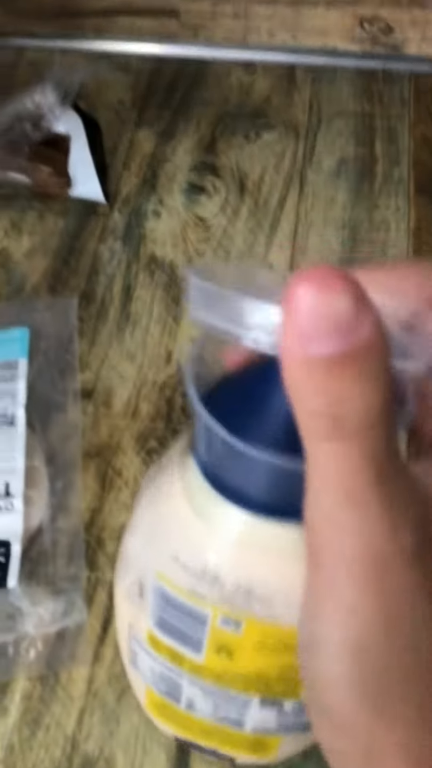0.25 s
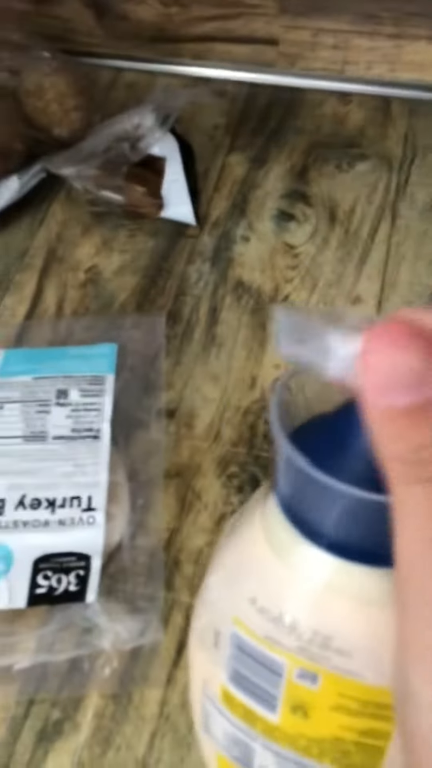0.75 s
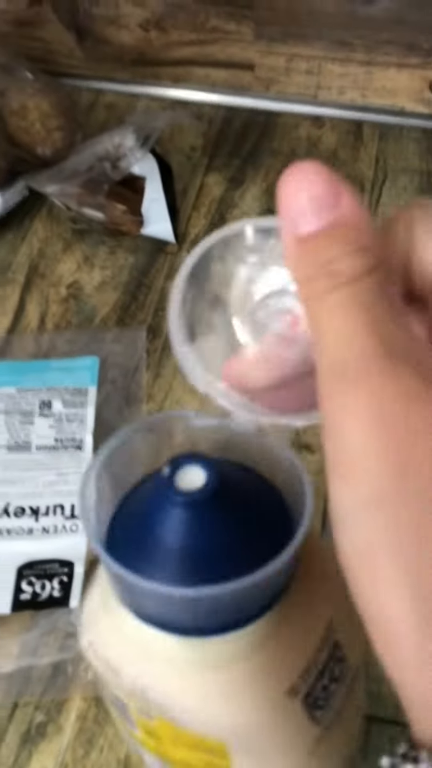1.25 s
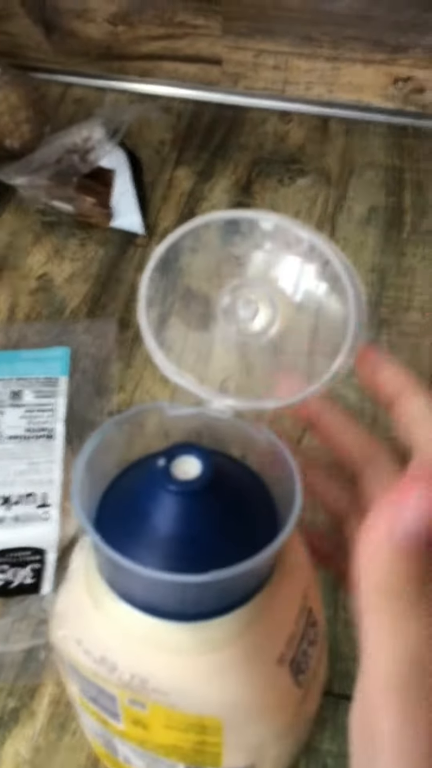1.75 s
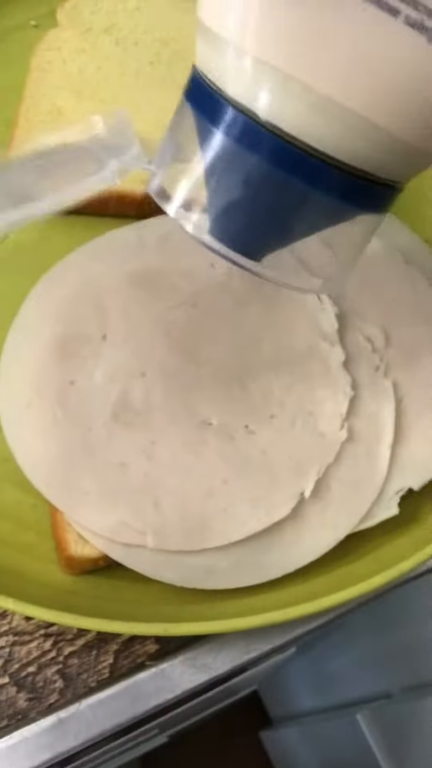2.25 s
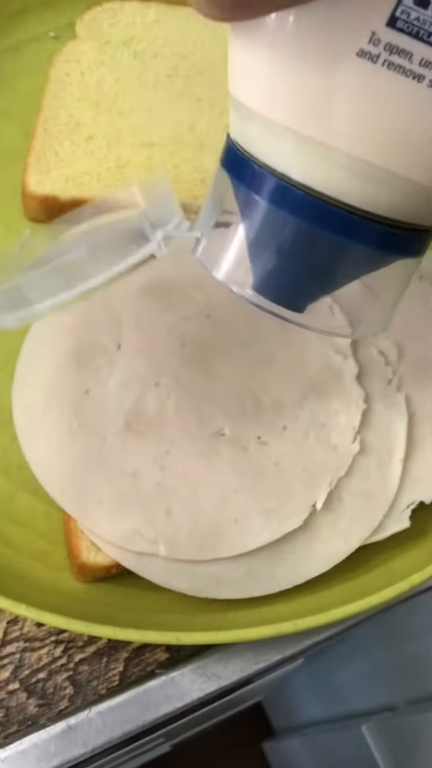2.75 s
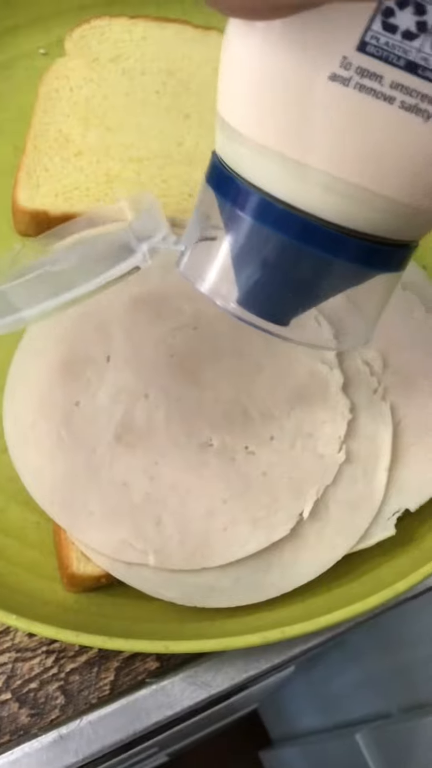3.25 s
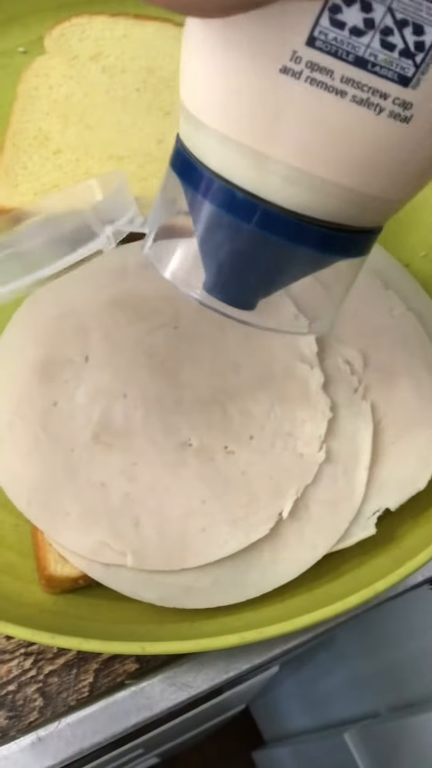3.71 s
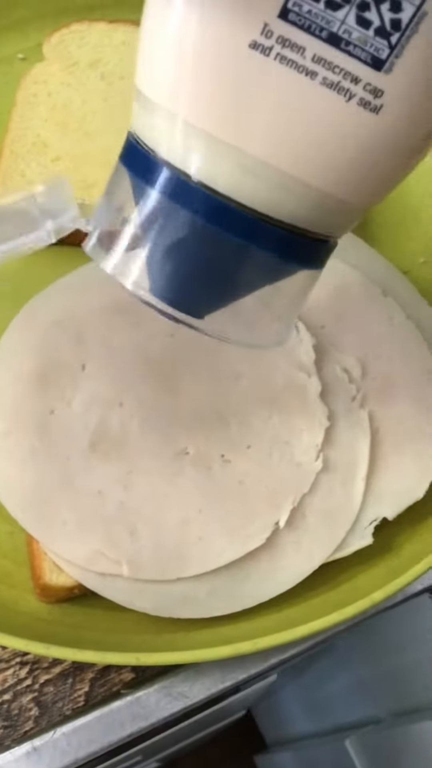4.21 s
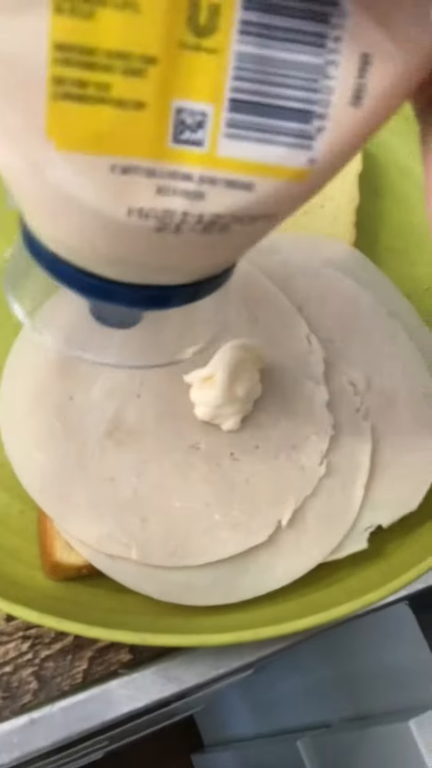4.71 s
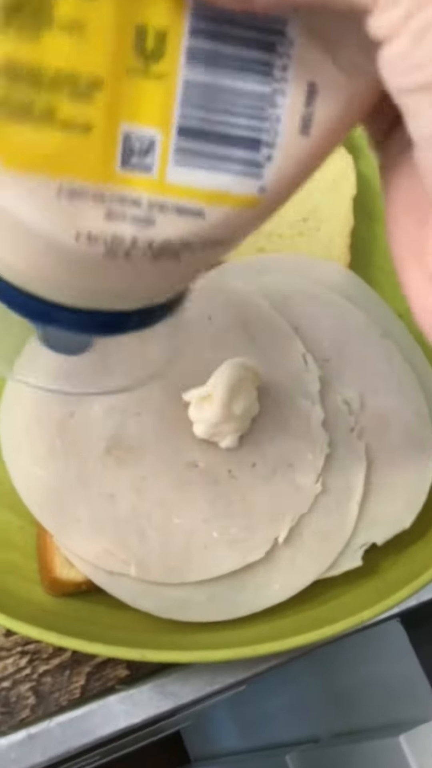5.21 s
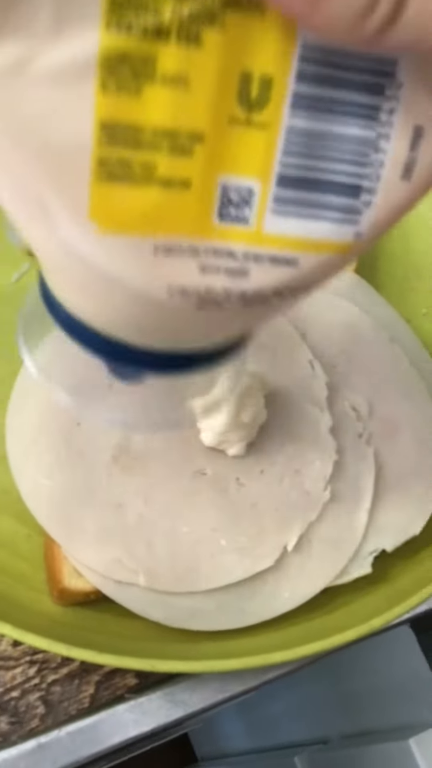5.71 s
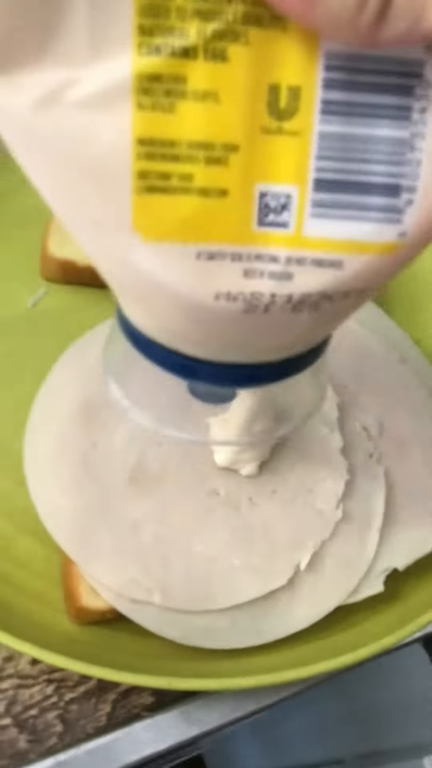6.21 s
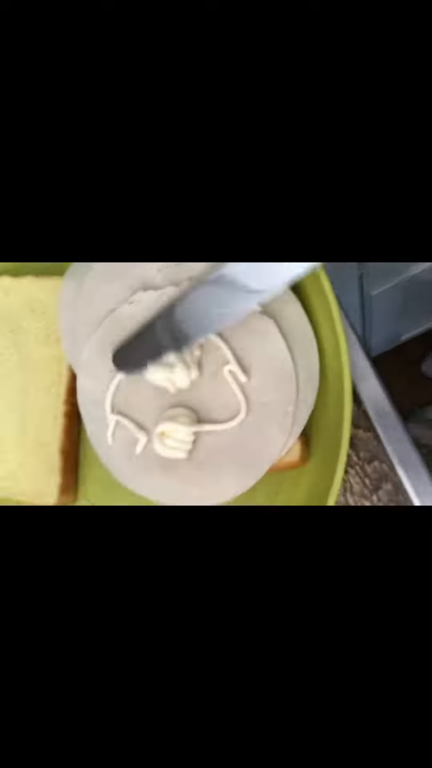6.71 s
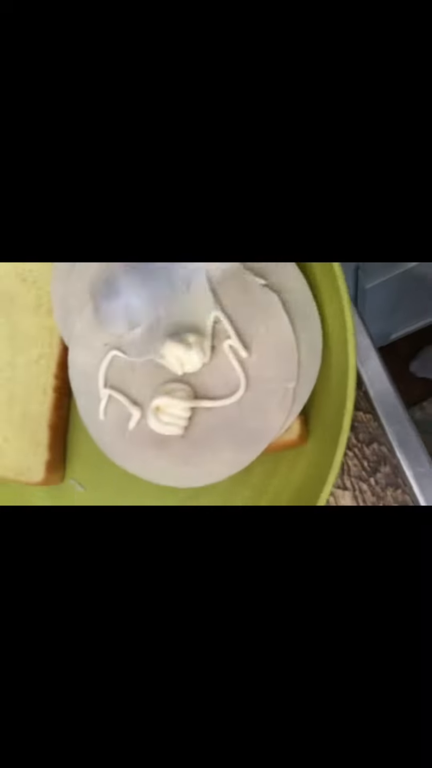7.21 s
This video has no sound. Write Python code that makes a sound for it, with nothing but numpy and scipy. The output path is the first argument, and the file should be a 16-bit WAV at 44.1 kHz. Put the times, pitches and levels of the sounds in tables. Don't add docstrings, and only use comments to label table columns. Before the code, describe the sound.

In a quiet kitchen with a humming fridge, a thumb rubs a plastic lid, which snaps open as the bottle knocks the table. Squeezed walls then crack loudly and pop hollowly, with a short hiss of air. Sauce sputters and squeaks out amid more crackles, and a knife smears it very quietly. Close small microphone, slight echo, abrupt cuts between four takes.

```python
import sys
import numpy as np
from scipy import signal
from scipy.fft import rfft, irfft
from scipy.io import wavfile
from scipy.ndimage import uniform_filter1d

SR = 44100
rng = np.random.default_rng(int(sys.argv[2]) if len(sys.argv) > 2 else 0)


def dump(signal):
    limited = np.clip(np.atleast_2d(signal).T, -1, 1)
    pcm = np.round(limited * 32767).astype(np.int16)
    wavfile.write(sys.argv[1], SR, pcm)


def boost_factor(decibels):
    exponent = np.asarray(decibels, float) / 20
    return 10 ** exponent


N = 328986

# (start [s], end [s])
JOINS = [
    (0, 1.8578),
    (1.8628, 4.4245),
    (4.4325, 6.6908),
    (6.6998, 7.5),
]
# (pitch [Hz], width [Hz], level [dB])
WALL = [(2300, 1400, 3.5), (3760, 430, 0.5), (5200, 890, 3), (6440, 540, 3.5), (8760, 1000, 4),
        (11595, 940, 0.5)]


def evened(x):
    return x / np.sqrt(np.mean(x ** 2) + 1e-20)


def read(points, hz):
    f, value = np.transpose(points)
    return np.interp(np.log(hz + 1), np.log(f + 1), value)


def add(mix, s, sound):
    part = mix[round(s * SR):][:len(sound)]
    part += sound[:len(part)]


def lumps(n, smooth):
    return evened(uniform_filter1d(rng.standard_normal(n), smooth))


def resonate(x, hz, width_hz):
    r = np.exp(-np.pi * abs(width_hz) / SR)
    c = np.cos(2 * np.pi * hz / SR)
    return 2 * (1 - r) * signal.lfilter([1, -r * c], [1, -2 * r * c, r ** 2], x)


def resonate_twice(x, hz, width_hz):
    return resonate(resonate(x, hz, width_hz), hz, width_hz)


def coloured(x, db):
    log_gain = np.log(boost_factor(np.concatenate([db, db[-2:0:-1]])))
    response = np.exp(log_gain - 1j * signal.hilbert(log_gain).imag)
    return irfft(rfft(x) * response[:len(db)], len(x))


def played(rows, sound, column=1):
    s, db = np.transpose(rows)[[0, column]]
    return sound * boost_factor(np.interp(np.arange(N) / SR, s, db, -200, -200))


def stroked(rows, sound):
    t = np.arange(N) / SR
    stroke_db = 22.5
    level = 0
    for s, db, swell, fade in rows:
        level = level + boost_factor(db - stroke_db * np.maximum((s - t) / swell, (t - s) / fade))
    return sound * level


def hiss(peaks, base_db, lumpy_db):
    n = rng.standard_normal(N) * boost_factor(lumpy_db * lumps(N, 200))
    n = signal.sosfilt(signal.butter(2, 1200, "high", fs=SR, output="sos"), n)
    ringing = sum(boost_factor(db) * resonate_twice(n, hz, width) for hz, width, db in peaks)
    return evened(boost_factor(base_db) * n + ringing)


def modes(table, rise, upper_db=0.):
    t = np.arange(SR // 3) / SR
    ring = 0
    for k, (hz, db, t60) in enumerate(table):
        ring = ring + boost_factor(db + upper_db * (k > 0) - 60 * t / t60) * np.sin(2 * np.pi * hz * t)
    ring = ring * (1 - np.exp(-t / max(rise, 1e-4)))
    return ring / abs(ring).max()


def room_noise():
    # (frequency [Hz], level [dB per Hz])
    hush_colour = [(40, -53), (62, -48), (85, -41.5), (110, -24.5), (160, -30.5), (210, -13), (300, -13),
                   (400, -21), (470, -26.5), (900, -30.5), (1300, -39), (2000, -41.5), (6000, -47.5),
                   (8000, -51), (16000, -54)]
    frames, hz = N // 256 + 5, np.fft.rfftfreq(1024, 1 / SR)
    a, b, patches = rng.standard_normal((frames, 513, 3)).T
    patches = evened(uniform_filter1d(uniform_filter1d(patches, 10, 0), 12, 1))
    spectrum = (a + 1j * b) * boost_factor(read(hush_colour, hz)[:, None] + 2.5 * patches)
    return evened(signal.istft(spectrum, nperseg=1024, noverlap=768)[1][:N])


def fridge():
    # (pitch [Hz], level [dB])
    hum = [(327.8, 0), (336.4, -14), (356.6, -15), (382.3, -15)]
    throb_hz = [109.3, 120.0]
    wobble, t = rng.standard_normal(N), np.arange(N) / SR
    tones = 0
    for hz, db in hum:
        steady = np.sqrt(2) * np.sin(2 * np.pi * hz * t)
        tones = tones + boost_factor(db) * (steady + 0.13 * evened(resonate(wobble, hz, 2.1)))
    whine = boost_factor(-29.5) * evened(resonate_twice(wobble, 6150, 600))
    throb = sum(np.sin(2 * np.pi * hz * t) for hz in throb_hz)
    return tones + whine, throb + 0.088 * evened(resonate(wobble, 100, 15))


def background():
    # (room noise [dB], fridge tone [dB], fridge throb [dB])
    levels = [
        (-57.5, -62.5, -65.5),
        (-60, -54.5, -67),
        (-58.5, -53.5, -66.5),
        (-58, -54.5, -65.5),
    ]
    tones, throb = fridge()
    return boost_factor(np.array(levels)) @ np.array([room_noise(), tones, throb])


def thumb_rubs():
    # (peak time [s], peak [dB], swell [s], fade [s])
    strokes = [(0.002, -67, .02, 0.16), (.238, -62, 0.18, 0.052), (.312, -71.5, 0.021, 0.19),
               (.482, -64.5, 0.03, 0.19), (.676, -55.5, 0.029, 0.045), (.545, -63.5, .04, 0.046),
               (.72, -73, 0.071, 0.17), (.838, -51.5, 0.058, 0.079), (.968, -58, 0.069, 0.1),
               (1.12, -47, 0.054, 0.067), (1.165, -31, 0.065, 0.02)]
    # (pitch [Hz], width [Hz], level [dB])
    lid = [(1820, 740, 3), (2600, 690, 4), (3780, 590, 3.5), (4350, 540, 3.5), (5200, 900, -2),
           (6300, 1740, 2), (8800, 1800, -6.5), (11100, 810, -5), (14000, 3400, -14)]
    return stroked(strokes, hiss(lid, -2.8, 1.9))


def snap(ring_hz, after_db, low_db, high_db, wall_db):
    t, hz = np.arange(8192) / SR, np.fft.rfftfreq(8192, 1 / SR)
    noise = rng.standard_normal(8192)
    tick = 3.09 * np.exp(-t / .00005) * np.sign(noise[0])
    crack = boost_factor(-60 * t / .007)
    grain_db = after_db + 2.1 * lumps(8192, 30)
    rattle = boost_factor(grain_db) * (boost_factor(-60 * t / 0.041) + boost_factor(-8.5 - 60 * t / 0.1))
    burst = noise * (crack + rattle) * (t < .13) + tick
    tilt_db = read([(150, low_db - 32.5), (500, low_db + 2.0), (1300, low_db + 9.0), (4000, 0.00023),
                    (10000, high_db + 4.5), (16000, high_db + 4.5)], hz)
    tilt_db = tilt_db - 2.5 * np.log2(ring_hz / 4500) * (hz < 1800) * (low_db < -10)
    ring_db = min(10, ring_hz / 350) / (1 + ((hz - ring_hz) / (300 + .06 * ring_hz)) ** 2)
    sound = coloured(burst, tilt_db + ring_db + wall_db)
    upper = irfft(rfft(sound) * (hz > 1800))
    return sound / abs(upper).max()


def snaps():
    bright = [(1.8673, -18.5, 13200, 6), (2.0412, -18, 8400, -11), (2.0851, -20.5, 11100, 0),
              (2.1152, -14, 5680, 5), (3.7085, -28, 12000, -5), (2.952, -24, 6850, -3),
              (2.6704, -31, 7490, -2), (2.851, -5.5, 13030, -14), (3.7304, -12, 5400, 0),
              (3.7571, -5.5, 10500, -2), (4.1867, -49, 8830, -5), (5.2287, -49, 12080, -5),
              (5.2523, -42, 12660, -1), (5.2652, -13.5, 5320, -18), (5.7308, -33, 14500, -15.5),
              (6.5465, -52, 14500, -10), (6.4368, -56, 7500, -9.5), (6.5385, -51, 7970, -7.5),
              (6.615, -57, 11460, -5), (4.417, -50, 12970, -7.5), (6.4879, -50, 12400, -6.5),
              (6.5317, -43.5, 14800, 0)]
    crisp = [(2.1824, -5.5, 7850, -11), (2.265, -40, 8480, -15), (2.6318, -9.5, 7600, -8.5),
             (2.8781, -5.5, 2600, -7), (4.1595, -37, 2150, 9), (4.4002, -25.5, 7880, -14),
             (5.428, -35, 8640, -14.5), (5.5, -3.5, 10300, -13), (5.5829, -11, 4360, -20),
             (1.174, -11.5, 4370, -25)]
    pinched = [(.673, -37, 6300, 1), (1.2008, -20, 2600, -23), (2.1216, -5, 9170, -9.5),
               (2.2538, -27.5, 7170, -11), (2.4725, -35.5, 5430, 3), (2.836, -17, 4300, -1.5),
               (2.8777, -0.5, 3200, -8.5), (2.889, -12.5, 1850, 6), (3.1016, -10.5, 4780, -12),
               (3.1019, -15.5, 3200, -12), (3.2174, -18, 4130, -11), (3.2172, -11, 7330, -9.5),
               (3.8633, -31.5, 10200, -16.5), (3.9082, -36, 4740, -12), (4.067, -41.5, 9440, -2.5),
               (4.2531, -30.5, 6380, -6.5), (4.2567, -17, 11300, -18), (4.5165, -15.5, 3760, -19),
               (5.3234, -19, 5000, -15.5), (5.4357, -19, 8500, -6), (5.5737, -19.5, 7560, -10),
               (5.9267, -25.5, 6460, -7.5), (5.5845, -20.5, 11800, -2), (6.505, -46, 8730, -2),
               (2.6313, -8, 8400, -8.5), (6.677, -21, 5150, -13)]
    full = [(2.1018, -17, 7220, 13), (2.118, -19.5, 8100, 3.5), (2.1602, -20.5, 8230, 2.5),
            (2.5748, -37, 2400, -2.5), (2.8022, -8.5, 5200, -5.5), (2.8052, -1, 4380, 2),
            (2.8076, -7.5, 1600, 2.5), (2.8395, -16, 4740, -0.5), (2.7855, -44.5, 9000, -12),
            (2.1234, -6.5, 5500, -8.5), (3.4407, -41, 3530, -11), (3.641, -20, 3000, 7),
            (3.8247, -33.5, 2490, -5), (4.1203, -47, 2300, 1), (4.1296, -47, 11730, 9),
            (4.1382, -32.5, 2360, -2.5), (4.2197, -34.5, 2750, -9), (4.5116, -26.5, 2190, -3),
            (4.5132, -15.5, 1890, 4.5), (5.245, -38, 2340, 3), (5.414, -21, 7640, -25),
            (5.6596, -42, 5000, 10), (5.483, -30, 5380, -8), (5.4952, -30, 5400, 13), (5.507, -24, 8660, 3),
            (5.5227, -13.5, 8540, 6), (5.7443, -21.5, 4870, -3.5), (5.8607, -40.5, 2330, -22.5),
            (6.561, -41, 1880, -7.5)]
    crinkle = [(3.1, -15.5, 9440, -5.5), (3.6862, -15, 12580, -14.5), (4.0732, -40, 12400, -3),
               (4.1039, -46, 10300, -2.5), (4.3023, -20.5, 11800, -10), (4.502, -30, 10850, -8.5),
               (5.21, -50, 11760, -3.5), (6.4282, -52, 1803, -11.5), (6.463, -55, 8350, -12),
               (6.5147, -54, 12600, 11), (6.5183, -36.5, 2020, -14), (6.595, -55, 2430, -7)]
    dents = [(1.1762, -23, 1900, -4), (2.4825, -19, 1900, -16), (2.8801, -24, 2110, 10),
             (3.4191, -41.5, 2240, -18), (3.6974, -14.5, 2300, -9.5), (5.631, -59, 1200, 0),
             (2.4832, -22, 1090, -7)]
    clacks = [(.309, -56.5, 2020, -4), (.4805, -47, 2740, 8), (.493, -48, 2010, 4),
              (.7191, -45.5, 2180, -10), (1.1728, -18.5, 2760, 5), (1.3217, -38.5, 2900, 2),
              (1.3225, -35, 1900, -3.5), (1.4117, -45, 1780, 2), (1.4238, -34.5, 1600, 17),
              (1.4537, -49, 2040, 12), (1.8001, -60, 1780, -1), (1.8113, -64, 1810, -13),
              (5.6686, -49, 2150, -19), (5.6848, -45.5, 1830, -5), (5.7134, -49, 1820, -4)]
    muffled = [(5.194, -42.5, 2700, -5), (5.3555, -41, 5100, 2), (5.6476, -35, 2100, 6),
               (5.3, -46, 2700, -6), (5.904, -59, 2500, -3), (6.5517, -34.5, 2730, -7.5),
               (3.6708, -26.5, 5530, -1), (5.9, -52.5, 2500, 5), (6.64, -59, 2000, -7),
               (4.418, -44.5, 2400, -9), (4.4463, -52.5, 1700, -1), (5.738, -46, 2500, -3),
               (3.3, -46, 2700, -3)]
    # (rows, lows [dB], highs [dB])
    kinds = [(bright, -15.5, 6), (crisp, -14.5, -0.86), (pinched, -20.5, -10.5), (full, -4, -1.1),
             (crinkle, -2, 9), (dents, 10.5, -3.5), (clacks, 9.8, -19.5), (muffled, -7.5, -23)]
    out, t, hz = np.zeros(N), np.arange(8192) / SR, np.fft.rfftfreq(8192, 1 / SR)
    wall_db = sum(db / (1 + (2 * (hz - f) / width) ** 2) for f, width, db in WALL)
    for rows, low_db, high_db in kinds:
        for s, db, ring_hz, after_db in rows:
            sound = boost_factor(db) * snap(ring_hz, after_db, low_db, high_db, wall_db)
            left = min(end - s for _, end in JOINS if end > s)
            add(out, s - .0001, sound[t < min(left, .15)])
    return out


def knocks():
    # (time [s], peak [dB], share of upper modes [dB])
    hits = [(0.478, -28, -15.5), (0.717, -28.5, -11.5), (1.173, -11.5, 1), (1.183, -14, -8),
            (1.322, -26.5, -8.5), (1.425, -26, -8), (1.443, -27.5, -11.5)]
    # (pitch [Hz], level [dB], time to die 60 dB [s])
    board = [(127.4, -3, 0.13), (143.6, -11, 0.15), (222.9, -10.5, 0.22), (270, -4, 0.099),
             (350, -8.5, 0.082), (398, -11, 0.062), (448, -17.5, 0.089), (600, -19, 0.04), (770, -16, 0.04),
             (1010, -16, .045), (1283, -11, 0.043)]
    out = np.zeros(N)
    for s, db, upper_db in hits:
        vary = rng.uniform([.985, .6, .8], [1.015, 1.4, 1.2], (len(board), 3))
        add(out, s, boost_factor(db) * modes(board * vary, 0.025, upper_db))
    return out


def creeping():
    # (peak time [s], peak [dB], swell [s], fade [s])
    creep = [(4.36, -74.5, .5, 0.3), (4.436, -71.5, .004, .09), (5.3, -70, .2, 0.42), (5.53, -71.5, .4, .5),
             (6.6, -79, .3, 0.058)]
    rustle = [(2.1232, -28, 0.016, 0.01), (2.128, -39.5, 0.031, 0.11), (2.882, -28, 0.0022, 0.095),
              (3.103, -59, 0.0023, 0.115), (3.219, -64, .002, 0.083)]
    fizz = [(3, -58.5, .06, .2), (3.645, -38, .01, .08), (3.76, -39, .002, .06), (2.89, -50.5, .02, 0.0897)]
    # (pitch [Hz], width [Hz], level [dB])
    belly = [(1800, 1200, 5.5), (2300, 310, 3), (3200, 590, 1), (4300, 1400, 2.5), (7000, 2500, -2.5),
             (9200, 1500, -3.5)]
    # (pitch [Hz], width [Hz], level [dB])
    label = [(9500, 2500, 0), (12000, 2500, 1), (14000, 2500, 4)]
    creaks = stroked(creep, hiss(WALL, 9, 6.0))
    return creaks + stroked(rustle, hiss(belly, -8, 2.5)) + stroked(fizz, hiss(label, -25.5, 2.5))


def pops():
    # (time [s], peak [dB], pitch [Hz], rise [s])
    flips = [(2.102, -17.5, 271.4, 0.0025), (2.183, -18.5, 241, 0.002), (2.483, -25.5, 270, .0021),
             (2.8061, -8, 240.6, 0.005), (2.879, -15, 283, 0.0012), (3.104, -31, 216, 0.0017),
             (3.643, -31, 290, 0.0021), (3.699, -19.5, 247, 0.0034), (4.388, -40.5, 285, 0.002),
             (5.523, -35.5, 256, 0.0018), (5.646, -44, 294, .0018), (5.667, -35.5, 282, 0.0009),
             (6.425, -46, 327, 0.0025), (6.561, -35.5, 311, 0.0015)]
    pop_cycles, grip_cycles = 11, 2.68
    out, t = np.zeros(N), np.arange(SR // 3) / SR
    for s, db, hz, rise in flips:
        t60 = pop_cycles / hz
        partials = [(hz, 0, t60), (2.2 * hz, -10, 0.66 * t60), (1.5 * hz, -8, 0.92 * t60),
                    (1.2 * hz, -8, 1.0 * t60), (3.3 * hz, -18, .6 * t60)]
        grip = .12 + 0.89 * np.exp(-(t * hz / grip_cycles) ** 4)
        add(out, s, boost_factor(db) * modes(partials, rise) * grip)
    return out


def panel_rings():
    # (time [s], peak [dB])
    hits = [
        (2.8785, -15.5),
        (2.806, -22),
    ]
    # (pitch [Hz], level [dB], time to die 60 dB [s])
    panel = [(360.2, -2, 0.081), (1450, -12, .05), (1779, 0, .075), (2180, -9, .12), (2320, -5.5, .11),
             (3036, -9, 0.11), (3606, -8, .06)]
    out = np.zeros(N)
    for s, db in hits:
        add(out, s, boost_factor(db) * modes(panel, 0.0011))
    return out


def air_jet():
    # (time [s], level [dB], whistle [dB])
    puffs = [
        (3.442, -73.5, -6.5),
        (3.47, -58, -6.5),
        (3.612, -52, 5.5),
        (3.63, -50, 3.5),
        (3.638, -40, -12),
        (3.645, -46, -13),
    ]
    # (pitch [Hz], width [Hz], level [dB])
    jet = [(3610, 800, 4), (5000, 900, -7), (7965, 700, -8), (9510, 1200, -8), (13500, 2000, -3.5),
           (15000, 1500, -6)]
    flutter = rng.standard_normal(N) * boost_factor(1.9 * lumps(N, 400))
    whistle = evened(resonate_twice(flutter, 1760, 670))
    return played(puffs, hiss(jet, -9.5, 0.73) + played(puffs, whistle, column=2))


def sputter():
    # (time [s], level [dB])
    bursts = [(4.5132, -11.5), (4.5155, -5), (4.5173, 0), (4.5193, -4), (4.5208, -5), (4.5236, -4),
              (4.528, -24.5), (4.535, -20)]
    # (pitch [Hz], level [dB], time to die 60 dB [s])
    nozzle = [(386, -5.5, 0.02), (459, -2.5, 0.07), (532, -2.5, 0.03), (654, -4.5, 0.025), (787, -4, 0.022),
              (980, 2, 0.014), (1328, 4.5, 0.02), (1600, 5, 0.013), (2150, 0, 0.014), (3690, -4.5, 0.017)]
    out = np.zeros(N)
    for s, db in bursts:
        vary = rng.uniform([.992, .6, 1], [1.008, 1.4, 1], (len(nozzle), 3))
        add(out, s, boost_factor(db - 13.0) * modes(nozzle * vary, 0.0006))
    return out


def squeaks():
    # (time [s], level [dB], start pitch [Hz], hold [s])
    voices = [
        (4.525, -24, 445, .018),
        (4.545, -35.5, 397, .011),
    ]
    # (multiple of the pitch, level [dB])
    overtones = [(1, 1), (2, -2.5), (3, -3.5), (4, -17.5), (5, -25)]
    climb_hz, climb_s, t60 = 170, 0.0305, 0.037
    out, t = np.zeros(N), np.arange(SR // 5) / SR
    for s, db, start_hz, hold in voices:
        rough = lumps(len(t), 120)
        pitch = (start_hz + climb_hz * (1 - np.exp(-t / climb_s))) * (1 + 0.028 * rough)
        turns = np.cumsum(pitch) / SR
        fade_db = -60 * np.maximum(t - hold, 0) / t60
        stack = sum(boost_factor(k_db + fade_db) * np.sin(2 * np.pi * k * turns) for k, k_db in overtones)
        add(out, s, boost_factor(db + 2.5 * rough) * stack * np.minimum(t / .003, 1))
    return out


def knife_spread():
    # (time [s], level [dB])
    drag = [
        (6.7, -77),
        (6.712, -60),
        (6.97, -65.5),
        (7.2, -70),
        (7.46, -68),
    ]
    # (frequency [Hz], level [dB per Hz])
    smear_colour = [(500, -6.5), (900, 2), (1500, 3), (2200, -19), (4000, -40)]
    gain = boost_factor(read(smear_colour, np.fft.rfftfreq(N, 1 / SR)))
    return played(drag, evened(irfft(rfft(rng.standard_normal(N)) * gain, N)))


def kitchen(x):
    # (frequency [Hz], level [dB])
    echo_colour = [(200, -3), (1200, -4), (2500, -1.5), (8000, -0.5)]
    # (frequency [Hz], time to die 60 dB [s])
    decay = [(200, 0.36), (1000, 0.25), (2200, 0.31), (4200, 0.26), (8000, 0.2), (15000, 0.047)]
    taps = np.zeros(SR // 2)
    at = np.arange(200, len(taps) - 10, 10)
    taps[at + rng.integers(0, 10, len(at))] = rng.choice([-1., 1.], len(at))
    hz, t, z = signal.stft(taps, SR, nperseg=256)
    tail_db = read(echo_colour, hz)[:, None] - 60 * t / read(decay, hz)[:, None]
    tail = signal.istft(z * boost_factor(tail_db), SR, nperseg=256)[1]
    return signal.fftconvolve(x, tail[None] / np.linalg.norm(tail), axes=1)[:, :N]


def scene():
    t = np.arange(N) / SR
    inside = np.array([np.clip(np.minimum(t - a, b - t) / .0006, 0, 1) for a, b in JOINS])
    far = background()
    near = thumb_rubs() + snaps() + knocks() + creeping() + pops() + panel_rings()
    near = near + air_jet() + sputter() + squeaks() + knife_spread()
    near = near * inside
    takes = (near + boost_factor(-18.5) * kitchen(near) + far) * inside
    return (takes.sum(0) + boost_factor(-87.0) * rng.standard_normal(N))[None]


def band_limit(x):
    return signal.sosfilt(signal.butter(12, 17140, fs=SR, output="sos"), x)


def record(dry):
    # (frequency [Hz], level [dB])
    edge = [(15500, -1), (15900, -24.5), (16900, -29.5), (17200, -70.5)]
    power_db = 10 * np.log10(abs(uniform_filter1d(dry[0] ** 2, 2000)) + 1e-12)
    fall = np.arange(N) * 13.0 / SR
    held_db = np.maximum.accumulate(power_db + fall) - fall
    over_db = np.maximum(held_db + 28.0, 0)
    ducked = dry / boost_factor(0.21 * uniform_filter1d(over_db, 2000, origin=999))
    cut = signal.sosfilt(signal.butter(4, 86, "high", fs=SR, output="sos"), ducked)
    cut = 1.1 * np.tanh(cut / 1.1)
    cut = irfft(rfft(cut) * boost_factor(read(edge, np.fft.rfftfreq(N, 1 / SR))), N)
    return band_limit(cut)


dry = scene()
out = record(dry)
dump(out)
```